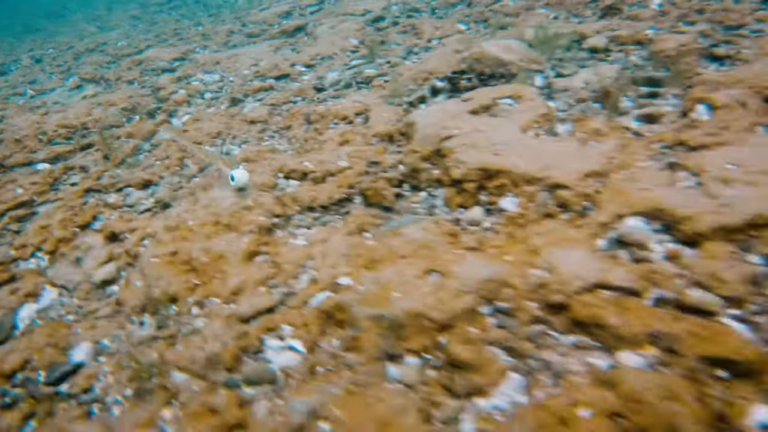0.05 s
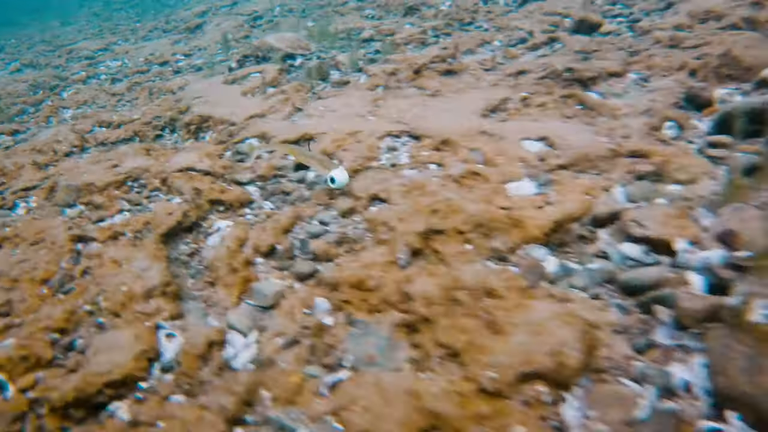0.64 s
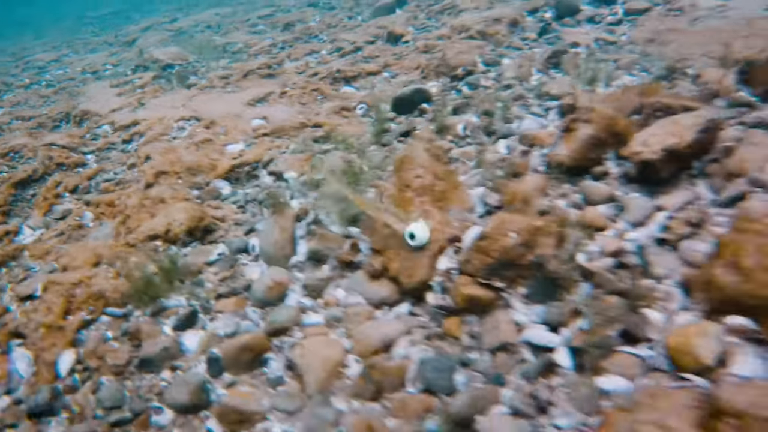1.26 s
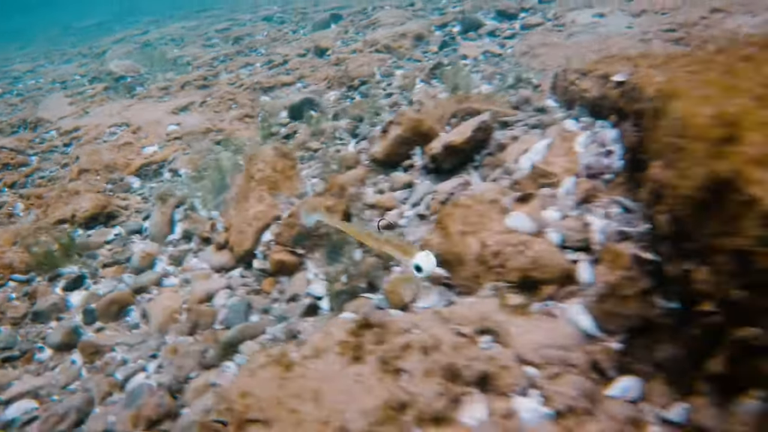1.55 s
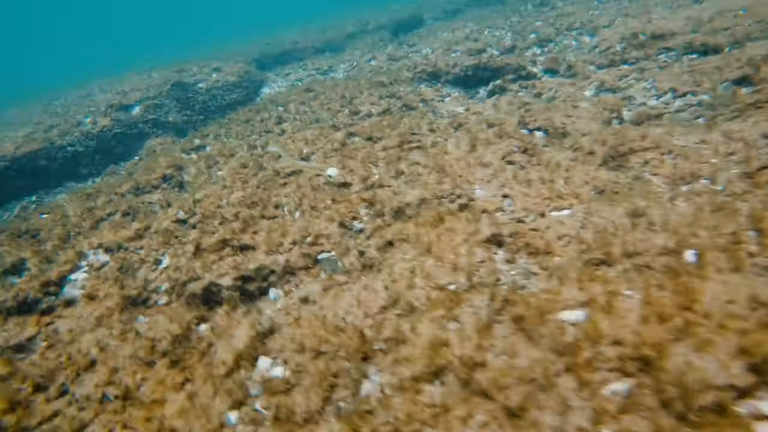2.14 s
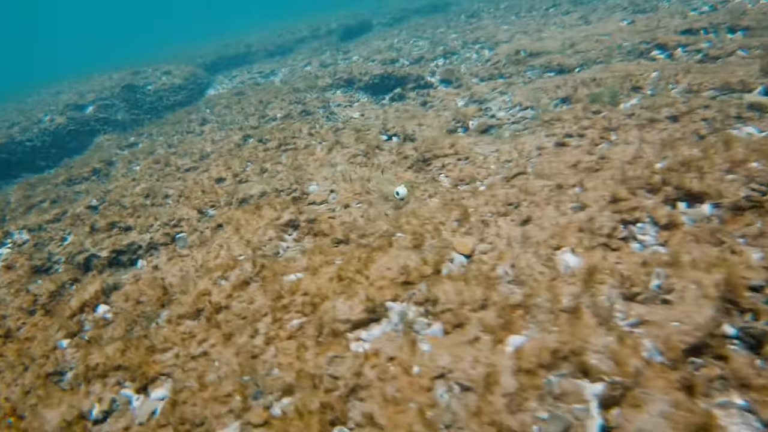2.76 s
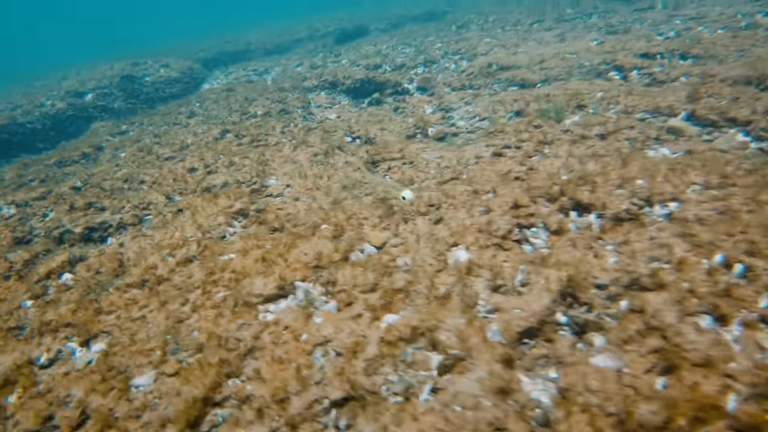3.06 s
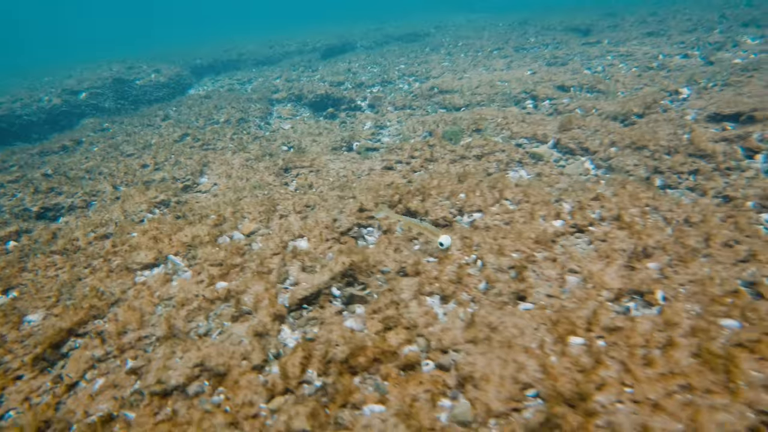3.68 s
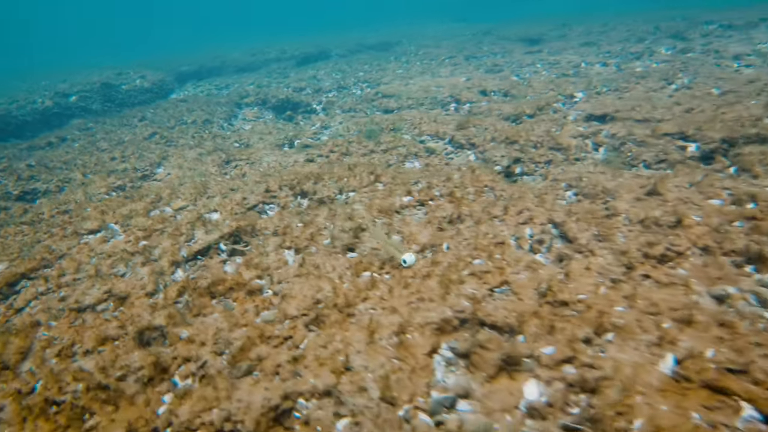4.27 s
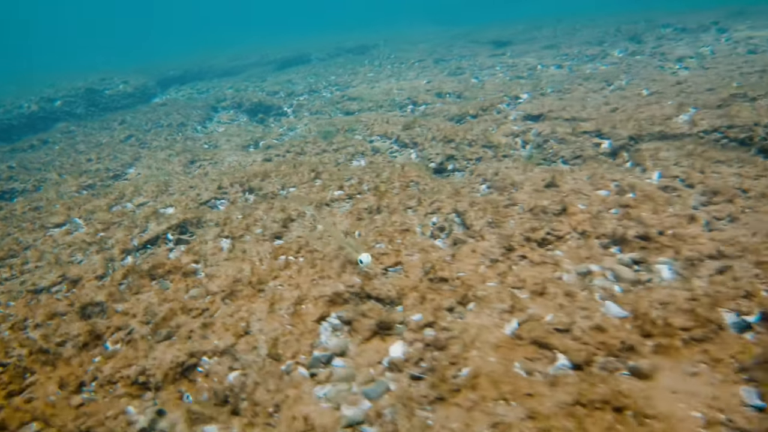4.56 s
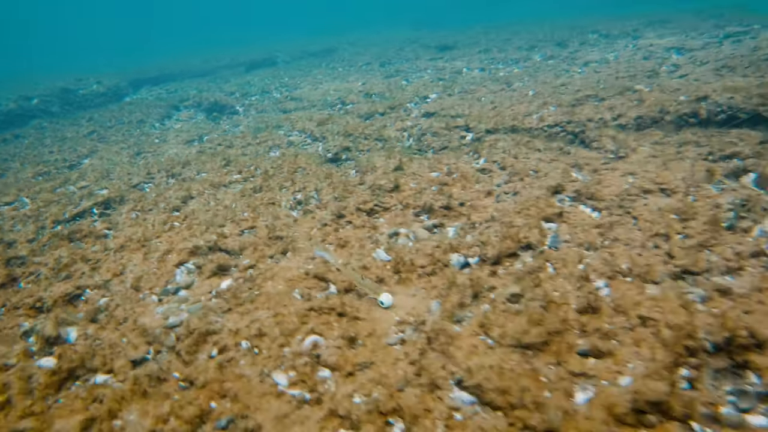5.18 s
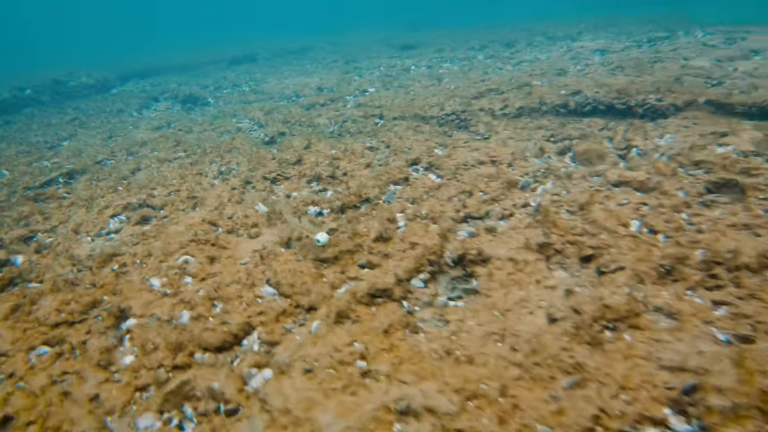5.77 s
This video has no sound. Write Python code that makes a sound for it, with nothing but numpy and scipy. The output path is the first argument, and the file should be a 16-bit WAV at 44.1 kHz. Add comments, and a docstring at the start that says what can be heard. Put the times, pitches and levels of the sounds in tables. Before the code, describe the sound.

Underwater, a fishing lure knocks along a rocky lake bottom in quick irregular clicks over a deep, surging water rumble.

```python
"""A jig dragged over a rocky lake bottom

A camera follows in a waterproof case. The jig's head knocks on stones and shells, and each impulse
excites the damped modes of the case; there are soft scuffs, gravel rustles and small bubbles plink.
Water pushes on the moving case in surges, shedding vortices heard as a deep throb with eddies, over
thumps, a rush, a hiss and one thin, dry click. A faint ticking runs throughout, a little louder later."""
import sys
import numpy as np
from scipy import signal
from scipy.fft import rfft, irfft
from scipy.io import wavfile
from scipy.ndimage import uniform_filter1d

SR = 44100
rng = np.random.default_rng(int(sys.argv[2]) if len(sys.argv) > 2 else 0)


def store_pcm(level_fs):
    """Save levels as 16-bit WAV."""
    pcm = np.round(np.clip(level_fs, -1, 1) * 32767).astype(np.int16)
    wavfile.write(sys.argv[1], SR, np.atleast_2d(pcm).T)


N = 256662

# surges of water against the case: start/s, length/s, level/dB, throb f/Hz
SURGES = [(.0, .15, -20, 30), (.21, .29, -17, 37), (.57, .12, -19, 33), (.84, .13, -17.5, 33),
          (1.15, .38, -17, 36), (1.60, .19, -18, 31), (1.84, .1, -21, 33), (1.98, .2, -11, 28),
          (2.35, .13, -16, 28), (2.5, .08, -20, 36), (2.62, .14, -20, 34), (2.8, .15, -18, 29),
          (3.18, .47, -14, 27), (3.77, .14, -18, 25), (3.91, .16, -9.5, 27), (4.14, .22, -14, 28),
          (4.47, .19, -18, 29), (4.69, .19, -8.5, 30), (5.16, .13, -11, 32), (5.41, .16, -17, 26)]
# slack water, when the push dies away: start/s, length/s
LULLS = [(2.97, .17), (3.67, .06), (5.03, .08), (5.58, .05)]
# eddies along the case: t/s, level/dB
EDDY_LEVELS = [(0.0, -35), (0.19, -47), (0.33, -39), (0.43, -29), (0.54, -46), (1.09, -38), (1.14, -52),
               (1.29, -43), (1.4, -39), (1.58, -52), (1.68, -44), (1.92, -46), (2.16, -44), (2.28, -55),
               (2.82, -49), (2.89, -57), (3.93, -61), (4.0, -54), (4.64, -60), (4.91, -44), (5.04, -58),
               (5.28, -50), (5.39, -66), (5.76, -62)]
# background of the water: t/s, rush level/dB, hiss level/dB
WATER_LEVELS = [(0.0, -53, -72), (1.0, -54, -72), (1.25, -59, -72), (1.69, -58, -72), (1.93, -52, -71),
                (2.32, -58, -70), (3.55, -57, -67), (3.66, -55, -67), (5.72, -57, -68), (5.82, -56, -67)]
# spectra of eddies, rush, hiss and crumbling grit: f/Hz, relative spectral level/dB
EDDY_SPECTRUM = [(20, -8), (41, 8), (58, -2), (80, .5), (115, -3.5), (160, -13), (230, -18), (400, -33),
                 (900, -70)]
RUSH_SPECTRUM = [(70, -12), (115, -2.5), (160, 1.5), (240, 2), (330, -7.5), (450, -9.5), (610, -4.5),
                 (705, 8), (790, -4), (950, -12), (1300, -18), (1700, -14.5), (2300, -28), (3500, -33),
                 (6000, -55)]
HISS_SPECTRUM = [(1500, -20), (3000, -8), (4200, -9), (5200, -2), (6200, 1), (7500, -1), (8700, -10),
                 (11500, -13), (13500, -25), (16000, -40)]
CRUMB_SPECTRUM = [(200, -14), (450, 1), (800, 3), (1000, -2), (1350, 1), (1750, -2), (2300, -14),
                  (2600, -8), (3000, -15), (4000, -19), (6500, -20), (9000, -34), (14000, -50)]
# likeness of the water noise at the two microphones: f/Hz, coherence (0 to 1)
COHERENCE = [(60, .6), (150, .4), (300, .35), (500, .65), (750, .8), (1500, .5), (3000, .35), (6000, .5),
             (12000, .2)]
# phase difference between them: f/Hz, left lead/rad
PHASE_LEAD = [(30, 0), (150, .2), (300, 1.0), (500, 1.9), (700, 2.5), (1100, 2.7), (1700, 0), (6000, 1.2)]
# level difference between them: f/Hz, left minus right/dB
BALANCE = [(60, -3.5), (240, -3), (490, -4), (980, -2), (1960, -1), (7920, -1.5)]
# bubbles: t/s, f/Hz, level/dB
BUBBLES = [(.001, 655, -15), (.732, 1830, -43), (.862, 245, -35), (.938, 790, -13), (1.002, 1740, -31),
           (1.003, 870, -26), (1.505, 1190, -25), (1.533, 1200, -33), (1.604, 1650, -42),
           (1.714, 1420, -39), (1.859, 2800, -47), (1.959, 1420, -37), (2.012, 1290, -38),
           (2.058, 880, -12), (2.064, 1050, -17), (2.986, 235, -36), (3.604, 240, -31), (4.667, 1720, -35)]
# water knocking against the case: t/s, f/Hz, level/dB
THUMPS = [(.005, 210, -30), (.105, 120, -33), (.395, 110, -20), (.425, 150, -29), (.452, 85, -20),
          (.665, 100, -32), (.864, 90, -23), (1.003, 170, -29), (1.07, 125, -27), (1.168, 210, -31),
          (1.29, 80, -33), (1.374, 160, -28), (1.738, 200, -31), (1.91, 220, -34), (2.415, 110, -34),
          (2.585, 450, -37), (2.70, 230, -37), (2.79, 130, -34), (5.30, 90, -38), (5.66, 430, -35),
          (5.79, 75, -25)]
# head on stone: t/s, level/dB, hardness near 1.9 kHz/dB, edge near 3 kHz/dB,
# shell-like tick near 7 kHz/dB, stone resonance f/Hz
KNOCKS = [(0.0397, -11, -1, -8, -26, 1500), (0.1861, 0, -1, 1, 7, 1450), (0.271, -4, 1, 0, 3, 1750),
          (0.4028, -5, -6, -2, -2, 1700), (0.5654, -12, -18, 0, 17, 1700), (0.5998, 2, -6, 1, 5, 2000),
          (0.6747, -3, -6, 3, 6, 1600), (0.8112, -4, -6, -8, -10, 1600), (0.8232, -8, -11, -5, -17, 1600),
          (1.0021, -14, 1, -1, 40, 1780), (1.1678, 0, -9, -6, 7, 1350), (1.3745, -12, -2, -8, 31, 1700),
          (1.473, -23, -4, 0, 6, 1500), (1.479, -20, -2, -2, 22, 1800), (1.504, -20, -2, 0, -4, 1200),
          (1.738, -18, 4, 1, 15, 2150), (1.9093, -8, -9, 0, 6, 1500), (1.923, -14, -3, 5, 10, 2100),
          (1.943, -21, -2, 5, 0, 1700), (2.04, -16, -3, 0, -12, 1500), (2.056, -6, -5, 2, -6, 1100),
          (2.071, -18, -4, 9, -8, 1650), (2.2416, -14, -4, -6, -11, 1450), (2.3085, -21, -4, -3, -1, 2000),
          (2.3685, -8, -14, -3, -7, 1500), (2.907, -19, -5, -4, 22, 2150), (3.151, -19, -11, 0, 9, 1700),
          (3.2448, -1, -6, -1, 0, 2000), (3.509, -21, -15, -2, 29, 1600), (3.826, -25, -9, 0, 20, 1700),
          (3.8838, -11, -16, -4, -12, 1750), (3.9877, -7, 1, -4, -15, 1950), (4.1288, -4, 2, 4, -1, 2150),
          (4.2046, -12, -2, 0, -16, 2100), (4.2855, -6, 2, -5, -4, 2150), (4.385, -20, -6, 0, 1, 1500),
          (4.432, -6, 3, 0, -12, 2100), (4.462, -7, 1, 2, -11, 2250), (4.6669, -21, 0, 0, 16, 1720),
          (4.7053, -2, -7, -3, -8, 1400), (4.8035, -6, -1, -4, -22, 1500), (4.912, -23, -5, -2, 23, 1700),
          (5.0768, -2, 0, 3, -1, 2100), (5.2054, -5, -5, -3, -19, 1500), (5.2684, -12, -3, 4, -10, 2200),
          (5.3074, -3, 3, 0, -4, 1780), (5.3225, -21, -1, 0, -2, 1900), (5.3605, -19, -5, -2, -1, 1700),
          (5.3755, -21, -2, -2, -2, 1800), (5.6602, -8, -2, -2, -8, 2050), (5.7683, -6, 2, 3, -7, 2250)]
# modes of the case: f/Hz, T60/s, level/dB, left minus right/dB, left lead/rad
CASE_MODES = [(526, 0.0012, 7.4, -13.1, -5.44), (677, 0.018, -7.1, 1.0, -3.45),
              (707, 0.0299, -13.7, -0.2, 2.33), (805, 0.0163, -4.8, -1.0, 2.25),
              (1051, 0.0253, -26.0, -2.4, 2.15), (1133, 0.022, -13.8, 1.4, -3.48),
              (1497, 0.0103, 5.9, -8.7, -2.84), (1499, 0.0081, 8.1, -11.2, 3.42),
              (1570, 0.0195, -17.8, -14.1, -3.45), (1943, 0.0152, -19.8, -14.6, 0.6),
              (2086, 0.0083, -10.0, -9.0, 0.21), (2355, 0.0098, -26.3, -6.8, -4.17),
              (2560, 0.0079, -19.9, 7.2, -0.87), (2909, 0.019, -41.9, -22.6, -7.6),
              (3133, 0.0051, -14.2, 4.2, 0.94), (3632, 0.0074, -29.1, 8.2, -7.88),
              (4188, 0.009, -39.8, 4.2, -7.16), (6010, 0.0025, -19.6, 9.7, 1.74),
              (6854, 0.0023, -16.3, -8.5, 2.15), (9997, 0.0007, -24.3, -6.8, 2.13)]
# patches of loose gravel under the head: centre t/s, half-width/s, added level/dB
LOOSE_PATCHES = [(.45, .2, 4), (1.53, .04, 7), (1.94, .17, 7), (3.85, .12, 5)]
# soft, dull scuffs and the rough burst of the larger bubbles:
# t/s, level/dB, centre f/Hz, time constant/s
SCUFFS_AND_BURSTS = [(.727, -38, 1800, .010), (4.25, -39, 1500, .02), (4.6, -37, 800, .015),
                     (.9365, -17.5, 780, .0012), (.938, -39, 1900, .003), (.949, -28, 780, .002),
                     (1.507, -34, 1500, .008), (2.058, -23, 950, .006), (2.06, -33, 1600, .006),
                     (2.105, -38, 1080, .006), (2.585, -26, 530, .001), (2.607, -35, 720, .002),
                     (2.624, -22, 780, .001), (2.626, -36, 1400, .004), (2.635, -24, 620, .0015),
                     (2.70, -32, 680, .001), (2.989, -31, 650, .0015), (3.222, -28, 740, .002),
                     (3.508, -26, 680, .0006), (3.599, -31, 680, .004), (3.657, -34, 800, .005),
                     (3.703, -35, 750, .006), (3.757, -27, 760, .001), (3.781, -26, 680, .0008),
                     (3.792, -36, 850, .003), (3.906, -31, 730, .001), (4.484, -35, 1500, .008)]

SIDES = np.array([[.5], [-.5]])   # shares a difference between left and right


def from_db(db):
    """Amplitude ratio of a level in decibels."""
    return 10 ** (np.asarray(db) / 20)


def unit_rms(x):
    """Normalisation to unit mean power."""
    return x / np.sqrt(np.mean(x ** 2) + 1e-20)


def in_time(rows):
    """Linear interpolation of each column of a time curve at every sample."""
    s, *columns = np.transpose(rows)
    return [np.interp(np.arange(N) / SR, s, c) for c in columns]


def at_hz(points, hz):
    """Interpolation of a spectrum on a logarithmic frequency axis."""
    f, value = np.transpose(points)
    return np.interp(np.log(hz + 1e-3), np.log(f), value)


def add(out, sound, s):
    """Superposition of a sound on the stereo signal from time s."""
    start = max(round(s * SR), 0)
    out[:, start:start + sound.shape[1]] += sound[:, :N - start]


def bell(x, hz, q, gain_db):
    """A second-order resonance or antiresonance: a causal peak or dip."""
    a = from_db(gain_db / 2)
    section = signal.bilinear([1, a / q, 1], [1, 1 / (a * q), 1], .5 / np.tan(np.pi * hz / SR))
    return signal.lfilter(*section, x)


def wander(hz):
    """Low-passed noise: a slow fluctuation of unit rms for each microphone."""
    return unit_rms(signal.sosfilt(signal.butter(4, hz, fs=SR, output="sos"), rng.standard_normal((2, N))))


def gate(t, start, length, attack_s=.05, release_s=.05):
    """A raised-cosine envelope from 0 to 1 and back, for one surge or lull."""
    rise, fall = (t - start) / attack_s, 1 - (t - start - length) / release_s
    return np.sin(np.pi / 2 * np.clip(np.minimum(rise, fall), 0, 1)) ** 2


def push(drift_db=-24, lull_db=-13):
    """Force of the water on the case in dB: surges add in power to a drift that slackens at times."""
    t = np.arange(N) / SR
    drift = from_db(drift_db + lull_db * sum(gate(t, s, length) for s, length in LULLS))
    surges = sum(from_db(db) * gate(t, s, length) for s, length, db, hz in SURGES)
    return 20 * np.log10(np.hypot(drift, surges))


def throb(push_db, level_db=-1.8, pan_db=-3.6, sway_db=1.5, stray_rad=.62, flutter_depth=.36):
    """Vortex shedding rocks the case at each surge's own rate; phase, balance and amplitude wander."""
    hz, = in_time([(s + length / 2, hz) for s, length, db, hz in SURGES])
    phase = 2 * np.pi * (np.cumsum(hz) / SR + rng.random()) + stray_rad * wander(hz=9)
    balance_db = (pan_db + sway_db * wander(hz=3)[0]) * SIDES
    flutter = 1 + flutter_depth * wander(hz=15)[0]
    return from_db(push_db + level_db + balance_db) * flutter * np.sin(phase)


def water_noise(spectrum):
    """Partial coherence: each microphone gets shared noise and its own; their mean has unit rms."""
    hz = np.arange(N // 2 + 1) * SR / N
    shared, *own = rfft(rng.standard_normal((3, N)))
    coherence = np.clip(at_hz(COHERENCE, hz), 0, 1)
    coherent = np.sqrt(coherence) * shared * np.exp(1j * SIDES * at_hz(PHASE_LEAD, hz))
    diffuse = np.sqrt(1 - coherence) * np.array(own)
    x = irfft((coherent + diffuse) * from_db(at_hz(spectrum, hz) + SIDES * at_hz(BALANCE, hz)), N)
    return x / x.mean(0).std()


def flow(push_db, coupling=.3, settle_s=.5, lumpy_db=2.8):
    """Flow noise: low eddies swell with each surge, over a rush in the case's resonance and a hiss."""
    eddy_db, = in_time(EDDY_LEVELS)
    rush_db, hiss_db = in_time(WATER_LEVELS)
    swing_db = push_db - uniform_filter1d(push_db, int(settle_s * SR))
    eddy_db = eddy_db + coupling * swing_db + lumpy_db * wander(hz=17)[0]
    eddies = from_db(eddy_db + 2.5) * water_noise(EDDY_SPECTRUM)
    rush = from_db(rush_db + 4.2) * water_noise(RUSH_SPECTRUM)
    hiss = from_db(hiss_db + .8) * water_noise(HISS_SPECTRUM)
    return eddies + rush + hiss


def rings(events, swell_s, rough, rise_per_s=0, jostle_hz=130, size=6000):
    """Damped oscillators (t/s, f/Hz, level/dB, T60/s), randomly jostled in amplitude and phase."""
    out, t = np.zeros((2, N)), np.arange(size) / SR
    smooth = signal.butter(2, jostle_hz, fs=SR)
    for s, hz, db, t60 in events:
        sway, slip = rough * unit_rms(signal.lfilter(*smooth, rng.standard_normal((2, size))))
        phase = 2 * np.pi * hz * t * (1 + rise_per_s * t) + slip + SIDES * at_hz(PHASE_LEAD, hz)
        envelope = from_db(db + SIDES * at_hz(BALANCE, hz) - 60 * t / t60) * (1 - np.exp(-t / swell_s))
        add(out, envelope * (1 + sway) * np.sin(phase), s)
    return out


def bubbles(level_db=3, t60_at_1khz_s=.047, t60_exponent=-.28):
    """Bubbles freed by pebbles pulsate, rising slightly in pitch; larger, lower ones ring longer."""
    plinks = [(s, hz, db, t60_at_1khz_s * (hz / 1000) ** t60_exponent) for s, hz, db in BUBBLES]
    return from_db(level_db) * rings(plinks, swell_s=.001, rough=.27, rise_per_s=.1)


def thumps(level_db=2, t60_s=.07):
    """Water knocks against the case and sets off low, quickly damped oscillations."""
    return from_db(level_db) * rings([(s, hz, db, t60_s) for s, hz, db in THUMPS], swell_s=.004, rough=.25)


def grains(t, t60_s, swell_s):
    """A decaying spray of uneven micro-impacts, independent at each microphone, with unit energy."""
    impacts = rng.standard_normal((2, len(t))) * rng.exponential(1, len(t))
    spray = impacts * from_db(-60 * t / t60_s) * (1 - np.exp(-t / swell_s))
    return spray / np.linalg.norm(spray)


def knocks(level_db=1.5, crush_db=-2, crush_t60_s=.009, scatter_db=-17, contact_hz=4000, size=6000):
    """Impact on stone: a force pulse and a brief crush of grains, then scattering from the bottom."""
    out, t = np.zeros((2, N)), np.arange(size) / SR
    # the blow carries the low part, the crushed grains the treble
    blow = signal.lfilter(*signal.butter(1, contact_hz, fs=SR), 1. * (t == 0))
    treble = signal.butter(2, contact_hz, "high", fs=SR)
    rough_rock = signal.butter(1, 1700, fs=SR)   # returns little treble
    for s, db, hard_db, edge_db, tick_db, stone_hz in KNOCKS:
        crush = rng.standard_normal(size) * from_db(-60 * t / crush_t60_s)
        crush = signal.lfilter(*treble, crush / np.linalg.norm(crush))
        scatter = signal.lfilter(*rough_rock, grains(t, t60_s=.04, swell_s=.003))
        pulse = blow + from_db(crush_db) * crush + from_db(scatter_db) * scatter
        pulse = bell(pulse, hz=1900, q=1, gain_db=hard_db + 1.3)
        # light and soft touches are duller, brittle ones brighter
        dull_db = .45 * (min(db + 2, 0) + min(hard_db + 6, 0))
        pulse = bell(pulse, hz=3150, q=1.8, gain_db=edge_db + dull_db + .13 * tick_db)
        pulse = bell(pulse, hz=380, q=1.5, gain_db=-.5 * (db + 7))   # light ones are more of a thud
        # every stone adds a peak and a dip of its own
        pulse = bell(pulse, hz=stone_hz, q=6, gain_db=3.5)
        pulse = bell(pulse, hz=1900 * 2 ** (.6 * rng.uniform(-1, 1)), q=7, gain_db=-4.5)
        # brittle shell gives a broad, two-humped tick with a crisp top
        pulse = bell(pulse, hz=5800, q=1.6, gain_db=.4 * tick_db - 1)
        pulse = bell(pulse, hz=7600, q=1.15, gain_db=.69 * tick_db)
        pulse = bell(pulse, hz=12200, q=1.6, gain_db=.48 * tick_db - 1)
        add(out, from_db(db) * pulse, s)
    return from_db(level_db) * out


def case(force, wall_band_hz=(500, 2500), size=2048):
    """Modal response of the case: each mode reaches each microphone with its own level and phase."""
    t = np.arange(size) / SR
    response = sum(from_db(db + SIDES * pan_db - 60 * t / t60) * np.sin(2 * np.pi * hz * t + SIDES * lead)
                   for hz, t60, db, pan_db, lead in CASE_MODES)
    wall = signal.butter(1, wall_band_hz, "band", fs=SR, output="sos")
    return signal.sosfilt(wall, signal.fftconvolve(force, response, axes=1)[:, :N])


def crumbs(level_db=1.7, t60_s=.12, grains_per_s=1800, size=8192):
    """Grit crumbles all around after each knock: a diffuse field, smoother in spectrum than the blow."""
    out, t = np.zeros((2, N)), np.arange(size) / SR
    magnitude = from_db(at_hz(CRUMB_SPECTRUM, np.arange(size // 2 + 1) * SR / size))
    # folding the cepstrum gives a causal filter of that magnitude
    cepstrum = irfft(np.log(magnitude))
    cepstrum[1:] *= 2 * (np.arange(1, size) < size // 2)
    response = np.exp(rfft(cepstrum))
    for s, db, hard_db, _, tick_db, _ in KNOCKS:
        spray = grains(t, t60_s, swell_s=.002) * (rng.random(size) < grains_per_s / SR)
        spray = irfft(rfft(spray / np.linalg.norm(spray)) * response)
        spray = bell(spray, hz=1900, q=1, gain_db=.5 * hard_db)
        spray = bell(spray, hz=6800, q=1, gain_db=.7 * tick_db)
        add(out, from_db(db + level_db) * spray, s)
    return out


def ticking(ticks_per_s=21.218, phase_s=2.2088, t60_s=.012, hz=5200, q=4, drive_db=26):
    """Periodic bursts, probably the camera's electronics, drive a resonance; levels follow the hiss."""
    age = (np.arange(N) / SR - phase_s) % (1 / ticks_per_s)
    _, hiss_db = in_time(WATER_LEVELS)
    bursts = from_db(hiss_db + drive_db - 60 * age / t60_s) * rng.standard_normal((2, N))
    resonance = signal.iirpeak(hz, q, fs=SR)
    return signal.lfilter(*resonance, signal.lfilter(*resonance, bursts))


def grit(level_db=-38, spread_db=3, bare_rock_per_s=15, crowding_exponent=1.7):
    """Grains touch the head as a Poisson process, harder and more often on loose gravel."""
    t = np.arange(N) / SR
    loose_db = sum(db * np.exp(-((t - s) / width) ** 2) for s, width, db in LOOSE_PATCHES)
    grain_db = level_db + loose_db + spread_db * np.minimum(rng.exponential(1, N), 3)
    impulses = from_db(grain_db) * rng.choice([-1, 1], N)
    touches = rng.random(N) < bare_rock_per_s * from_db(crowding_exponent * loose_db) / SR
    return bell(impulses * touches, hz=1900, q=1, gain_db=-11)


def scuffs_and_bursts(level_db=-1.5, q=2.1, size=4096):
    """Band-limited noise swells and fades: soft, dull scuffs and the rough burst of larger bubbles."""
    out, t = np.zeros((2, N)), np.arange(size) / SR
    for s, db, hz, swell_s in SCUFFS_AND_BURSTS:
        noise = rng.standard_normal(size) * t * np.exp(-t / swell_s)
        band = signal.iirpeak(hz, q, fs=SR)
        burst = signal.lfilter(*band, signal.lfilter(*band, noise))
        add(out, from_db(db + level_db) * burst[None] / np.linalg.norm(burst), s)
    return out


def gravel(level_db=-49.5, spread_db=2.7, centre_hz=1300, spread_octaves=.33, t60_s=.019, count=190):
    """The head ploughs through pebbles, whose many short rings add incoherently to a rustle."""
    times = rng.triangular(1.58, 1.99, 2.17, count)   # start, thickest, end: t/s
    pebbles = [(s, centre_hz * 2 ** (spread_octaves * pitch), level_db + spread_db * strength, t60_s)
               for s, (pitch, strength) in zip(times, rng.standard_normal((count, 2)))]
    return rings(pebbles, swell_s=.0004, rough=.3)


def click(at_s=2.0103, level_db=-24, t60_s=.008, size=2048):
    """One thin, dry click: a discontinuity in the signal has a broad spectrum and no pitch."""
    out, t = np.zeros((2, N)), np.arange(size) / SR
    add(out, from_db(level_db - 60 * t / t60_s)[None], at_s)
    return out


def scene():
    """Superposition of sounds heard through the case, the bottom, moving water, ticks and click."""
    push_db = push()
    water_thumps = thumps()
    through_case = case(knocks() + scuffs_and_bursts() + grit())
    bottom = crumbs() + bubbles() + gravel()
    return through_case + bottom + water_thumps + throb(push_db) + flow(push_db) + ticking() + click()


def record(dry, stopband_hz=16150):
    """Band limiting: a steep low-pass filter removes the highest treble."""
    return signal.sosfilt(signal.cheby2(12, 70, stopband_hz, fs=SR, output="sos"), dry)


dry = scene()
out = record(dry)
store_pcm(out)
```